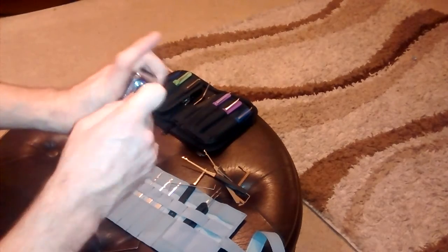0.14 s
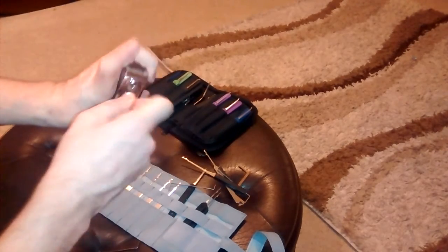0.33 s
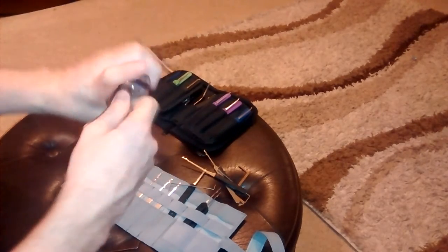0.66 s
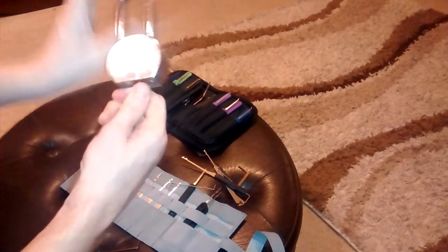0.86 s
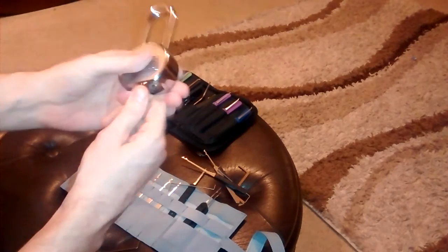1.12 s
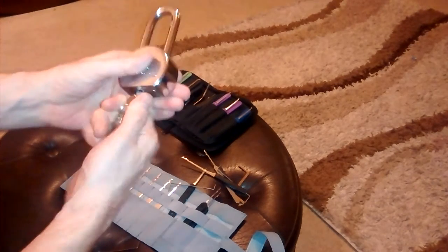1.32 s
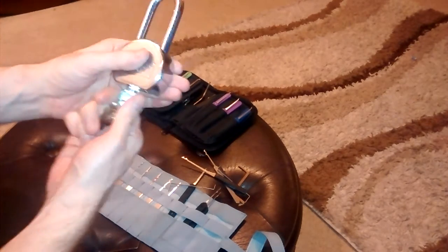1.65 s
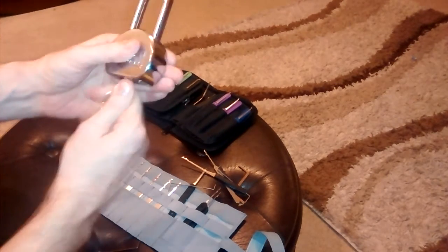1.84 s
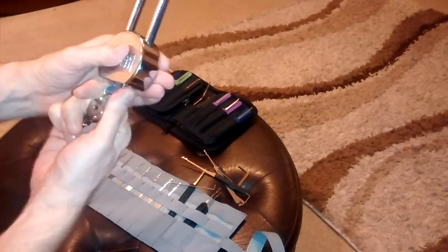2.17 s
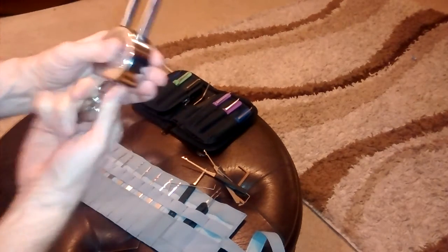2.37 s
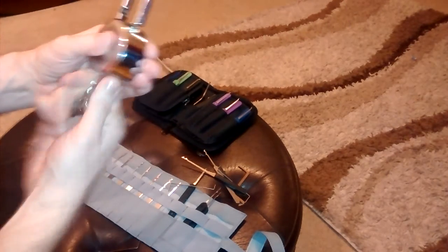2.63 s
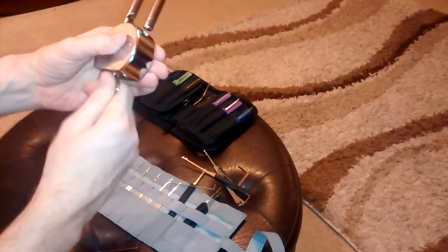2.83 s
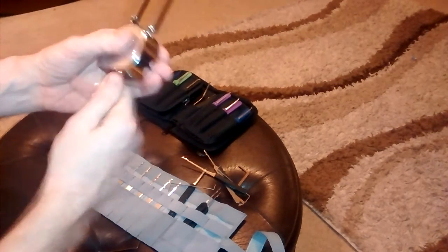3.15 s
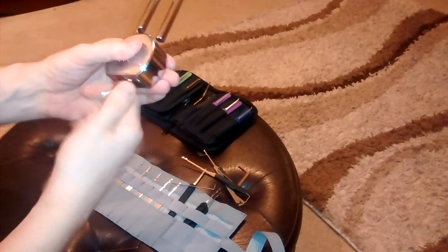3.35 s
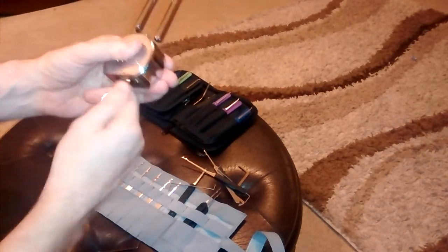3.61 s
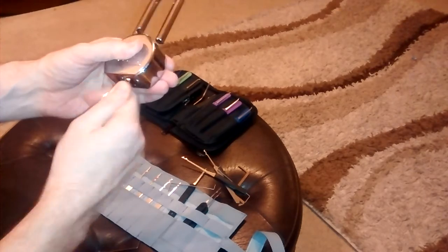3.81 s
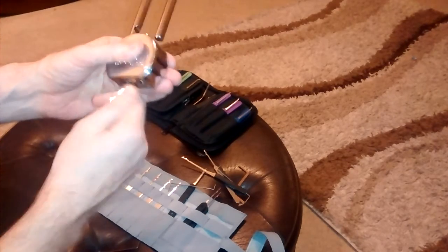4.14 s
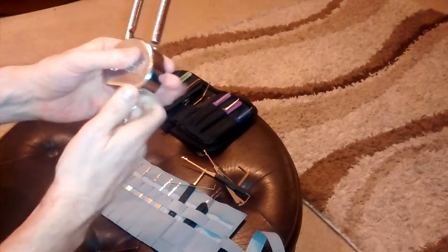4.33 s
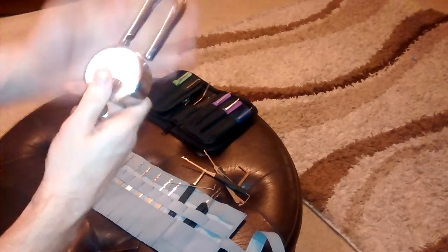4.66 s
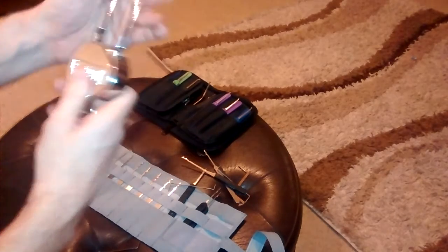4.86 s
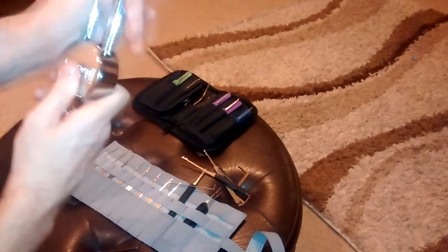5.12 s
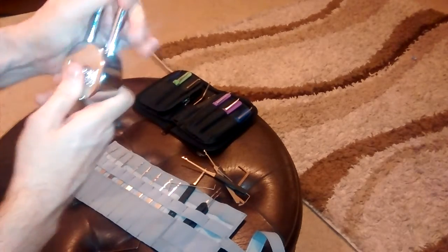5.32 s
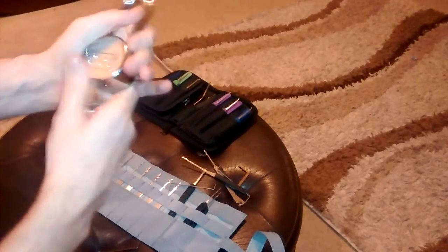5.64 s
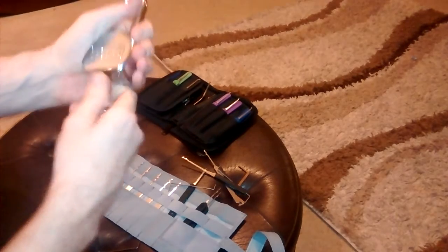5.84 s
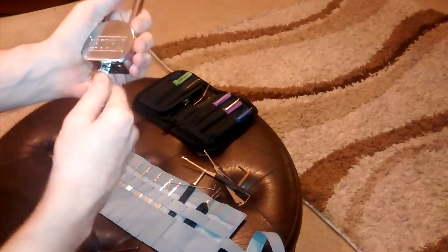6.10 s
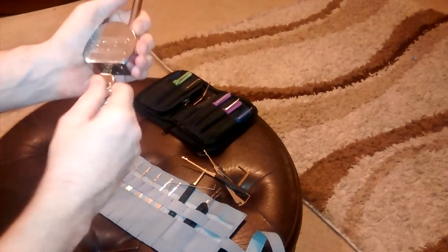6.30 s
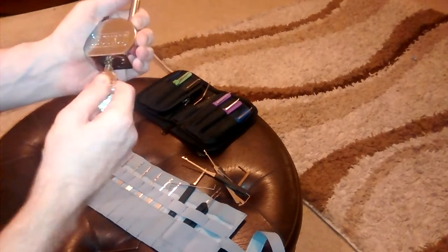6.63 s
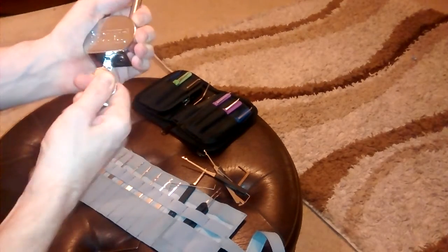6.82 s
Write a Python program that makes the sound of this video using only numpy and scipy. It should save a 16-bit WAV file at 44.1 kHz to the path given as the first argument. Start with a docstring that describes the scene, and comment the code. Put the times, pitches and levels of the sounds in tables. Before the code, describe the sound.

Close, dry clicks of a key and pins inside a handheld padlock, separated by short pauses. About a third of the way through, the shackle gives a loud, bright snap. More ticks and a soft jingle of keys lead to a second snap with a dull knock, before light chinking and clicking resume. The room is quiet, with only a faint hiss, hum and rumble.

```python
"""A quiet carpeted room: hands turn a key back and forth in a steel padlock, close to two microphones.
Pins and key tick by brief impacts, and the shackle snaps twice, exciting the modes of the lock body.
Loose keys chink in beating clusters of modes; hands and the heavy body give dull, damped knocks.
Hiss, rumble and a faint hum lie underneath. The recorder widens the stereo image,
and the level dips briefly after each of the two snaps."""
import sys
import numpy as np
from scipy import signal
from scipy.fft import rfft, irfft
from scipy.io import wavfile
from scipy.ndimage import uniform_filter1d

SR = 44100
rng = np.random.default_rng(int(sys.argv[2]) if len(sys.argv) > 2 else 0)


def log_audio(samples):
    """Write samples as a 16-bit WAV file to the path given in sys.argv[1]."""
    # one column per channel
    frames = np.atleast_2d(samples).T
    # limit to full scale, then quantise
    limited = np.clip(frames, -1, 1)
    pcm = np.round(limited * 32767).astype(np.int16)
    wavfile.write(sys.argv[1], SR, pcm)


N = 307655


def amp(db):
    """The decibel law: 20 dB is a factor of ten in amplitude."""
    return 10 ** (np.asarray(db) / 20)


def curve_at(points, hz):
    """Interpolation of (frequency, value) points on a logarithmic frequency axis."""
    f, value = np.transpose(points)
    return np.interp(np.log(hz + 1), np.log(f + 1), value)


def add(mix, start_s, sound):
    """Superposition: a sound adds to the mix from its onset."""
    part = mix[round(start_s * SR):][:len(sound)]
    part += sound[:len(part)]


def unit_rms(x):
    """Normalisation to unit mean power."""
    return x / np.sqrt(np.mean(x ** 2) + 1e-20)


def resonance(x, hz, width_hz):
    """Two equal resonators in cascade pass a band with steep sides."""
    b, a = signal.iirpeak(hz, hz / width_hz, SR)
    return signal.lfilter(b, a, signal.lfilter(b, a, x))


def free_vibration(modes, spread_db):
    """Modal decay: a blow starts all modes at once, their strengths set by where it lands."""
    hz, db, t60 = np.transpose(modes)[:, :, None]
    t = np.arange(SR // 8) / SR
    envelope = amp(db + spread_db * rng.standard_normal(hz.shape) - 60 * t / t60)
    return envelope * np.sin(2 * np.pi * (hz * t + rng.random(hz.shape)))


def hiss():
    """Incoherent broadband noise: room tone and self-noise, independent at each microphone."""
    # noise spectrum: f/Hz, level/dB in a 1 Hz band
    density = [(15, -110), (28, -100), (50, -82), (80, -83), (180, -84), (400, -88), (700, -94.5),
               (1000, -99), (2200, -101), (4000, -101), (7000, -102), (10000, -104), (15200, -105),
               (15700, -125)]
    white = rfft(rng.standard_normal((2, N)))
    return irfft(white * amp(curve_at(density, np.fft.rfftfreq(N, 1 / SR))) * np.sqrt(SR / 2), N)


def rumble():
    """Amplitude modulation: deep noise, independent at each microphone, swells and fades."""
    # envelope: t/s, level/dB
    swell = [(0, -86), (.76, -68), (3.2, -71), (3.4, -61.5), (4.26, -63), (4.53, -75), (5.4, -75),
             (6.51, -69), (6.98, -72)]
    deep = unit_rms(resonance(rng.standard_normal((2, N)), hz=37, width_hz=25))
    return amp(np.interp(np.arange(N) / SR, *np.transpose(swell))) * deep


def hum():
    """Narrow-band noise is heard as a wavering pitch; two such low tones swell and fade."""
    # envelopes: t/s, lower tone level/dB, upper tone level/dB
    swells = [(0, -80, -69), (.35, -81, -62), (.6, -86, -61.5), (.76, -64, -66), (1.14, -83, -76),
              (2.0, -85, -71), (2.2, -69, -65), (2.58, -80, -80), (2.93, -68, -64.5), (3.7, -69.5, -69),
              (3.85, -60, -70.5), (4.41, -55.5, -65.5), (4.75, -64, -72.5), (5.07, -69, -78),
              (5.27, -84, -82), (6.1, -74, -67.5), (6.55, -63, -65.5), (6.8, -71, -57.5), (6.98, -61, -66)]
    # tones: f/Hz, bandwidth/Hz
    bands = [(81, 9), (182, 10)]
    times, *levels = np.transpose(swells)
    t, noise = np.arange(N) / SR, rng.standard_normal((2, N))
    tones = [unit_rms(resonance(x, *band)) for x, band in zip(noise, bands)]
    return sum(amp(np.interp(t, times, db)) * tone for db, tone in zip(levels, tones))


def reverberation(x):
    """Sparse reflections of random sign decay exponentially, each band at its own rate."""
    # reverberation time: f/Hz, T60/s
    decay = [(300, 0.37), (1500, 0.28), (4000, 0.32), (8000, 0.25), (14000, 0.23)]
    reflections = np.zeros((2, SR // 2))
    slots = np.arange(320, SR // 2 - 20, 20)
    arrivals = slots + rng.integers(0, 20, (2, len(slots)))
    np.put_along_axis(reflections, arrivals, rng.choice([-1., 1.], arrivals.shape), axis=1)
    hz, t, spectra = signal.stft(reflections, SR, nperseg=128)
    tail = signal.istft(spectra * amp(-60 * t / curve_at(decay, hz)[:, None]), SR, nperseg=128)[1]
    return signal.fftconvolve(x[None], tail / np.linalg.norm(tail[0]), axes=1)[:, :N]


def thuds():
    """Heavy damping: a soft blow of a hand or the lock body gives a short tone with low noise."""
    # knocks: t/s, level/dB, f/Hz, T60/s
    knocks = [(0.747, -31.5, 337, 0.03), (0.759, -41, 248, 0.084), (0.859, -49, 302, .05),
              (.439, -42.5, 403, 0.032), (2.367, -39, 467, 0.02), (5.004, -44.5, 296, 0.018),
              (5.152, -32.5, 497, 0.029)]
    out, t = np.zeros(N), np.arange(SR // 8) / SR
    for start, db, hz, t60 in knocks:
        noise = unit_rms(resonance(rng.standard_normal(len(t)), 0.3 * hz, width_hz=660))
        add(out, start, amp(db - 60 * t / t60) * (np.sin(2 * np.pi * hz * t) + .5 * noise))
    return out


def loose_keys():
    """Beating: touching keys ring in clusters of close modes, roughened by rattling contact."""
    # chinks: t/s, level/dB, relative level/dB of the middle and of the top cluster
    chinks = [(4.292, -55, 2, 7), (4.313, -54, 11, 10), (4.3296, -52.5, 3, 4), (4.461, -59, -1, 6),
              (4.5181, -49, -3, -1), (4.5376, -42, -3, 7.5), (4.555, -46, -2, 3), (4.6073, -44, -7, -15),
              (4.63, -59, 1, 10), (4.6926, -60, 6, -10), (4.7496, -55.5, 6, 3.5), (5.256, -42, 3, 5),
              (5.305, -45, -6, -4), (5.84, -46, -1.5, -7), (5.8538, -50, -3, 2), (5.91, -52, 5, -6),
              (5.9284, -49, 3, -14), (5.9386, -40.5, -11, -4), (5.97, -47, -6, -21)]
    # key modes, three clusters of three, lowest first: f/Hz, level/dB, T60/s
    key_modes = [(8130, -6, .07), (8250, -2, .08), (8340, 0, .08), (11700, 0, .07), (11890, -4, .06),
                 (12060, -4, .06), (13240, -3, .07), (13400, -6, .06), (13560, 0, .07)]
    out = np.zeros(N)
    for start, db, middle_db, top_db in chinks:
        cluster_gain = amp(db + np.repeat([0, middle_db, top_db], 3))[:, None]
        modes = cluster_gain * free_vibration(key_modes, spread_db=3.)
        rattle = unit_rms(uniform_filter1d(rng.standard_normal(modes.shape), 70))
        chink = (modes * (1 + .9 * rattle)).sum(0)
        attack = 1 - np.exp(-np.arange(len(chink)) / 63.0)
        add(out, start, chink * attack)
    return out


def contact(db, ms, hz, knock_db, clack_db, edge_db, ring_db):
    """Impact excitation: a chatter of tiny blows sounds the touched part and rings the lock body."""
    # modes of body and shackle: f/Hz, level/dB, T60/s
    body_modes = [(3850, -8, .05), (4460, -2, .07), (4850, -5, .07), (5400, -10, .05), (7120, -5, .08),
                  (7370, -4, .08), (7730, -9, .09), (8000, -7, .08), (8470, -4, .08), (9740, -8, .06),
                  (11400, -5, .08), (11580, -5, .08), (12750, -1, .09)]
    t, length_s = np.arange(1024) / SR, max(ms, .3) / 1000
    impacts = rng.standard_normal(len(t)) * amp(3.95 * rng.exponential(1, len(t)))
    attack = 1 - np.exp(-t / (0.12 * length_s))  # longer contacts build up more slowly
    chatter = impacts * np.exp(-(t / length_s) ** 1.13) * attack
    onset = slice(0, round(ms * SR / 1000) + 20)
    # part, low knock, clack, bright edge: f/Hz, bandwidth/Hz, relative level/dB
    bands = [(hz, 1700, 0), (1537, 1000, knock_db), (4230, 3400, clack_db), (11270, 3200, edge_db)]
    click = np.zeros(len(t))
    for centre_hz, width_hz, band_db in bands:
        layer = resonance(chatter, centre_hz, width_hz)
        click += amp(db + band_db) * layer / layer[onset].std()
    body = free_vibration(body_modes, spread_db=2.).sum(0)
    out = amp(ring_db) * signal.fftconvolve(click, body)
    add(out, 0, click)
    return out


def pin_and_key_ticks():
    """Inelastic collision: each struck part ticks, then rebounds once, more softly."""
    # ticks: t/s, level/dB, chatter length/ms, part f/Hz, relative level/dB of knock and of clack
    ticks = [(0.1836, -57, 2.3, 4120, 1, 1), (.19, -42, 3, 7300, -17, -8), (0.2304, -42, 2.7, 6100, -20, 2),
             (.3748, -45, 3.4, 6700, -17, 0), (0.3967, -51, 6.9, 7400, -5.5, 3),
             (0.4033, -40, 3.8, 6070, -28, -8), (.4175, -44.5, 11, 5850, -10.5, 3),
             (.429, -44, 8.8, 7100, -8, 2), (0.4545, -47, 2.1, 7900, -1, -13),
             (0.464, -53, 9.3, 4860, -30, -8), (0.4755, -61, 21, 4800, -17, -5.5),
             (.5036, -57, 12, 4960, -24, -1), (0.569, -53.5, 3.6, 3800, -6, -4),
             (0.579, -55, 1.2, 4070, -17, 3), (.6936, -48.5, 1.16, 3600, -19, 5),
             (0.7145, -48, 1.7, 5400, -21, -3), (0.746, -49.5, 0.91, 6000, -18, 7),
             (0.8238, -42, 2.1, 6360, -17, -6.5), (0.8885, -49, 0.32, 3400, -12.5, 7),
             (1.1348, -49.5, 0.66, 6050, -7, 6.5), (1.1509, -59, 2.3, 2620, -1, 1),
             (1.2637, -45, 2.6, 5270, -13, -16), (1.305, -58, 0.84, 3320, 8, -11),
             (1.8375, -45.5, 2.3, 3070, -6, -16), (1.8508, -47, 0.78, 3460, -2, 7),
             (1.86, -39.5, 2.5, 6600, -27, -10), (2.0225, -55, 6.7, 4140, 6, 12.5),
             (2.0363, -41.5, 4.4, 6840, -16, -14), (2.0418, -44, 2.1, 7260, -30, 2),
             (2.0832, -53, 3.4, 7100, -10, 3.5), (2.096, -50.5, 3.3, 7240, -10, -11),
             (2.243, -53.5, 2.2, 6130, -8, 0), (2.5217, -54.5, 5.2, 7560, -10, 3.5),
             (2.571, -49.5, 1.5, 6350, -28, -1), (2.736, -44.5, 2.1, 6400, -17, -14),
             (2.8847, -39.5, 0.53, 5900, -8, -0.5), (2.8889, -42.5, 5.7, 5700, -15, -3.5),
             (2.905, -53, 4.1, 8750, -9, -7), (3.0723, -30, 1.8, 6300, -22.5, -11),
             (3.0894, -40, 2.8, 6300, -12.5, -1.5), (3.0946, -43, 2.4, 9000, -20, -7),
             (3.1487, -55.5, 4.5, 2610, -4, 7), (3.315, -39, 9.1, 6600, -16, -24),
             (3.3225, -33, 2.8, 5850, -18, -2.5), (3.5271, -33, 0.62, 6100, -29, -7.5),
             (3.543, -47, 3, 6300, -15, -9), (3.617, -60, 5.1, 2560, 5, -1),
             (3.6334, -56, 3.7, 6040, -6, 4), (3.64, -44, 5.7, 5800, -14, -1),
             (3.785, -41.5, 3, 6200, -18, -6), (3.7929, -38.5, 2.2, 6370, -24, -8.5),
             (3.897, -48, 2.5, 2530, -3, 0), (3.9095, -48, 3.9, 6250, -9, 2),
             (3.916, -29.5, 2.7, 6070, -20, -5), (4.0272, -54, 11, 8500, -6, 0),
             (4.039, -54.5, 6.2, 5940, -4, 5), (4.0449, -32, 2.3, 6080, -20, -12),
             (4.1656, -51, 2.5, 3580, -7, -1), (4.228, -55, 2, 6200, -11, -13),
             (4.282, -45.5, 1.9, 3270, -10, -8), (4.2859, -46.5, 3.4, 6900, -6.5, -9),
             (4.3015, -43.5, 0.96, 6100, -12, 1), (4.3065, -51, 13, 6330, -8.5, -19),
             (4.335, -56, 6.5, 6500, -13, 3), (4.448, -53.5, 1.2, 6200, -7, 1),
             (4.5659, -48, 5.4, 3870, -9.5, -7), (4.603, -51.5, 4.5, 3360, -2, -4),
             (4.63, -59, 4.6, 3560, 1.5, 0), (4.902, -51, 4.8, 7500, -14, -3),
             (5.038, -49, 6, 2510, -32, -19), (5.3773, -45.5, 5.3, 4060, -10, 4.5),
             (5.4137, -42, 3, 7600, -25, -18), (5.419, -51, 2.1, 4700, -20, -11),
             (5.657, -57, 2, 3640, 2, -4), (5.927, -40, 2.2, 7200, -9.5, -2),
             (5.994, -37.5, 2.4, 5650, -20, -6.5), (6.028, -51, 1.9, 3290, -8, -10),
             (6.191, -44.5, 3.1, 5900, -13, -5.5), (6.2282, -52.5, 1.7, 2550, -7, -3),
             (6.399, -50, 1.1, 7230, -13, -12), (6.4033, -35.5, 1.2, 6500, -11, -5),
             (6.4185, -51.5, 1.4, 5000, -8, -4), (6.51, -54, 2.5, 7000, -7, 2),
             (6.5417, -50.5, 3.3, 7060, -3.5, 1), (6.553, -41.5, 5.3, 8400, -17, -3),
             (6.561, -36, 2.7, 6150, -7.5, -6), (6.5726, -37.5, 3, 9200, -12.5, -7),
             (6.659, -52, 3.6, 6240, -6, -3), (6.6717, -44, 0.53, 3260, -9, -13),
             (6.6819, -33, 1.4, 6020, -15.5, -1.5), (6.6846, -50, 5.2, 5200, -19, -9),
             (6.6936, -51, 0.91, 3800, -2, -10), (6.8765, -42, 0.66, 5970, -16, 0),
             (6.88, -47, 1.7, 6200, -11, -3), (6.9007, -36.5, 3.2, 6140, -48, -11),
             (6.9203, -44, 2.4, 2760, -24, -24), (6.9366, -47.5, 2.7, 6000, -6, 5)]
    pin_hz, pin_spread_hz, pin_edge_db = 6250, 1000, -6  # sprung pins tick duller than other parts
    rebound_range_s, rebound_db = (0.011, 0.024), -21.5
    ring_db = -50.5  # the hand damps the body
    out = np.zeros(N)
    for start, db, ms, hz, knock_db, clack_db in ticks:
        combined_db = 10 * np.log10(amp(knock_db) ** 2 + amp(clack_db) ** 2)
        edge_db = 0.65 * combined_db - 1  # the bright edge partly follows knock and clack
        edge_db += pin_edge_db * np.exp(-((hz - pin_hz) / pin_spread_hz) ** 2)
        for delay, gain_db in ((0, 0), (rng.uniform(*rebound_range_s), rebound_db)):
            add(out, start + delay, contact(db + gain_db, ms, hz, knock_db, clack_db, edge_db, ring_db))
    return out


def shackle():
    """Impulsive excitation: the latch knocks, catches and snaps home in quick groups of blows."""
    # blows: t/s, level/dB, chatter length/ms, part f/Hz,
    # relative level/dB of knock, clack and bright edge, gain/dB of the body's ring
    blows = [(0.4346, -45, 1.7, 8400, -26, 3, -7, -47), (0.4397, -23, 2.1, 8000, -40, -1, -11, -43),
             (0.4437, -38.5, 2.6, 4370, -16, -7, 0, -50),
             (2.3666, -10.5, 2.7, 8030, -18, -5.5, -3.5, -34.5),
             (2.3718, -23.5, 7.4, 6340, -14.5, -7.5, -2, -30.5),
             (5.0035, -43.5, 3.14, 4060, -3, 15.5, -10, -56), (5.1293, -40.5, 8.1, 3880, -10, 11, -2, -42),
             (5.1438, -27, 13, 4900, -29, 0, -7, -65), (5.1498, -20.5, 5.7, 6600, -18.5, -4.5, -16, -64),
             (5.165, -25.5, 6.4, 7040, -9.5, 4, -1, -47), (5.1527, -10, 2.6, 6600, -19, -3.5, -4, -47)]
    out = np.zeros(N)
    for start, *blow in blows:
        add(out, start, contact(*blow))
    return out


def scene():
    """Diffraction: the lock faces the left microphone; the recorder shades and delays the right."""
    # response of the far microphone: f/Hz, relative level/dB
    shadow = [(300, -4), (1200, -7.5), (2400, 9), (3300, -6.5), (3900, -32.5), (4700, 4), (6000, -12),
              (7000, -31.5), (9000, -10), (15000, -19)]
    # treble takes the longer way round the recorder: f/Hz, delay/ms
    far_delay = [(600, .15), (2100, .156), (3000, .215), (3600, .218), (4200, .356), (6600, .354),
                 (7500, .395), (15000, .385)]
    room_left_db, room_right_db = -9, -4.5
    reflected_shadow = 0.61  # share of the shading, in dB, that acts on reflections
    near = pin_and_key_ticks() + shackle() + loose_keys() + thuds()
    hz = np.fft.rfftfreq(N, 1 / SR)
    shadow_db = curve_at(shadow, hz)
    lag = np.exp(-2j * np.pi * hz * curve_at(far_delay, hz) / 1000)
    far = irfft(rfft(near) * amp(shadow_db) * lag, N)
    room_left, room_right = amp([room_left_db, room_right_db])[:, None] * reverberation(near)
    room_right = irfft(rfft(room_right) * amp(reflected_shadow * shadow_db), N)
    return np.array([near + room_left, far + room_right]) + hiss() + hum() + rumble()


def record(dry):
    """Crosstalk subtraction widens the image; slow level changes, clipping and a low-pass follow."""
    # what each side loses of the other: f/Hz, amplitude ratio
    cross_gain = [(40, 0.42), (300, 0.68), (1200, 0.68), (3700, 0.62), (4800, 0.24), (6300, 0.22),
                  (9000, 0.084), (14500, 0.033)]
    # lag of that copy: f/Hz, delay/ms
    cross_delay = [(40, .408), (1200, .408), (2550, .393), (3700, .405), (4700, .426), (6300, .4),
                   (8000, .39), (14500, .385)]
    start_db, rise_s = -2, 0.31  # the level comes up at first
    dips, recovery_s = [(2.385, -1.5), (5.161, -11.5)], 0.27  # after the snaps: t/s, level/dB
    hz, t = np.fft.rfftfreq(N, 1 / SR), np.arange(N) / SR
    crosstalk = curve_at(cross_gain, hz) * np.exp(-2j * np.pi * hz * curve_at(cross_delay, hz) / 1000)
    spectra = rfft(dry)
    wide = irfft(spectra - crosstalk * spectra[::-1], N)
    rise_db = start_db * np.exp(-(t / rise_s) ** 2)
    dips_db = sum(db * (t > start) * np.exp(-abs(t - start) / recovery_s) for start, db in dips)
    gain = amp(rise_db + uniform_filter1d(dips_db, size=256))
    clipped = np.clip(wide * gain, -.9, .9)
    low_pass = signal.firwin(511, cutoff=16500, window=("kaiser", 9), fs=SR)
    return signal.oaconvolve(clipped, low_pass[None], "same")


dry = scene()
out = record(dry)
log_audio(out)
```